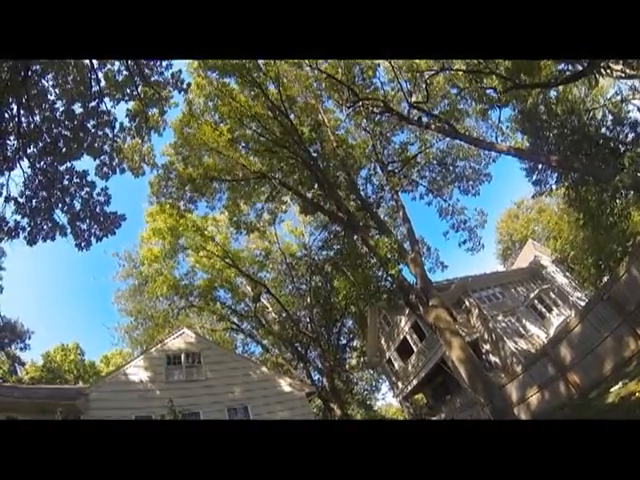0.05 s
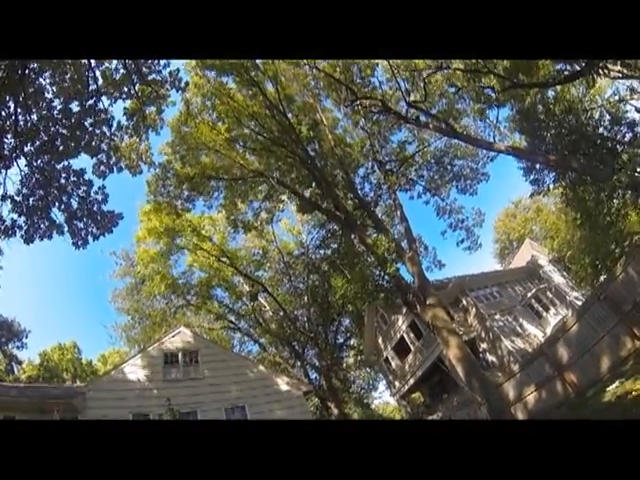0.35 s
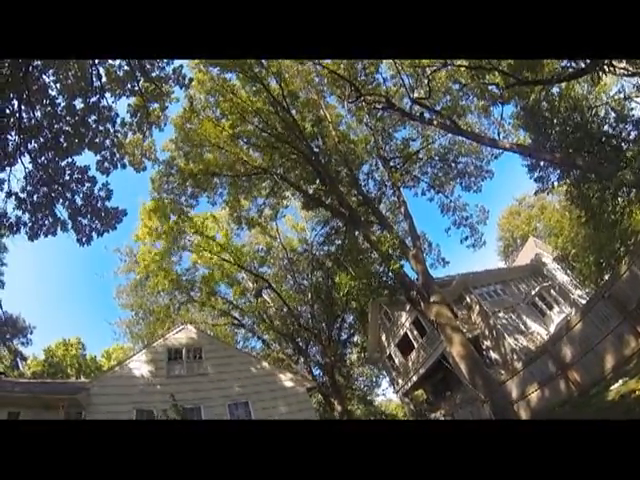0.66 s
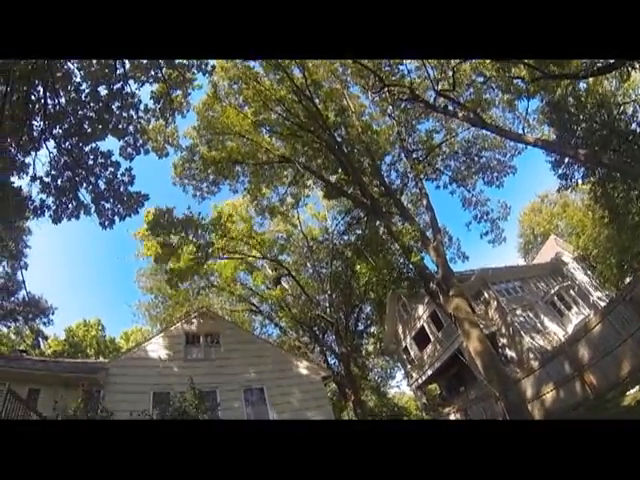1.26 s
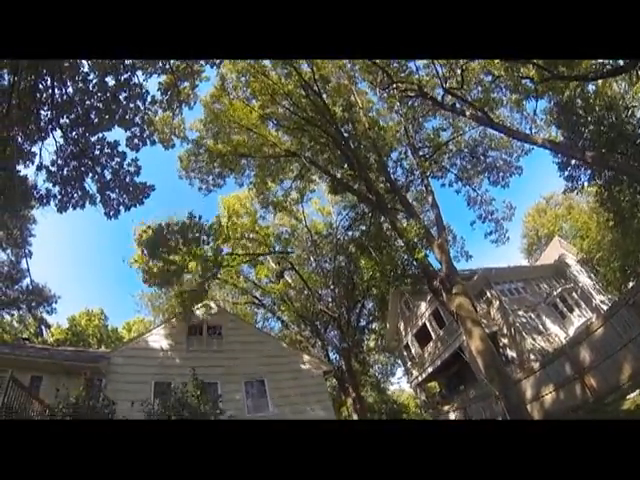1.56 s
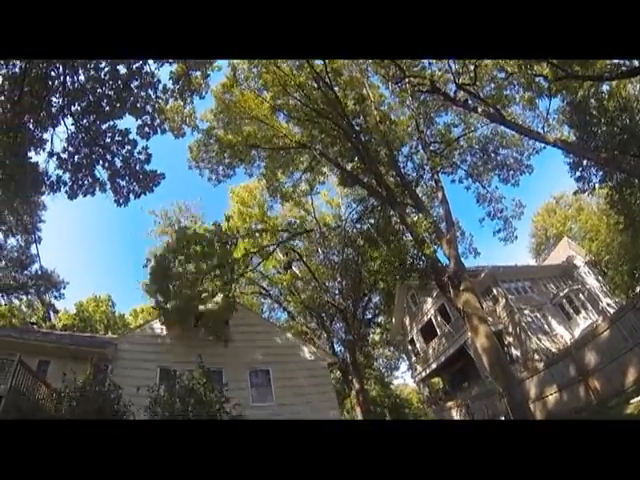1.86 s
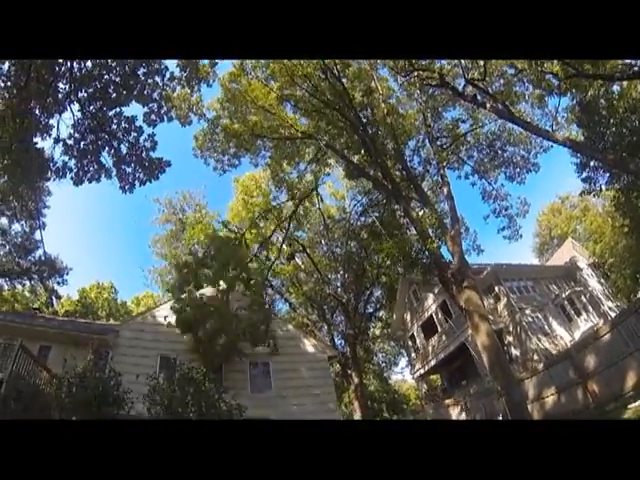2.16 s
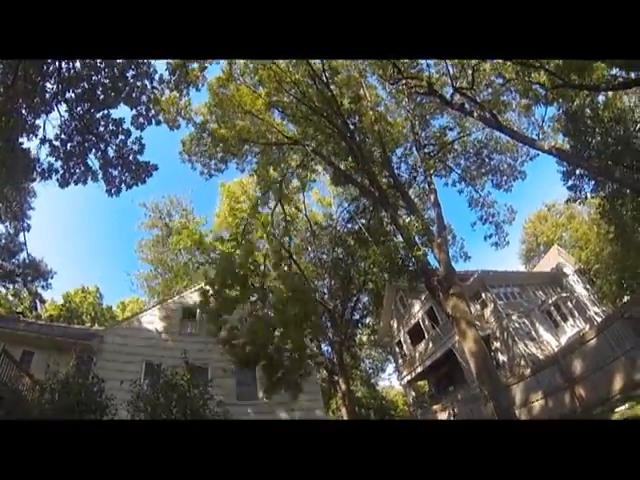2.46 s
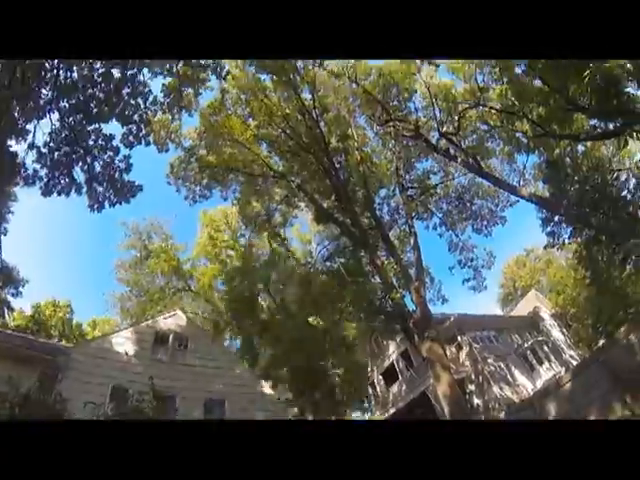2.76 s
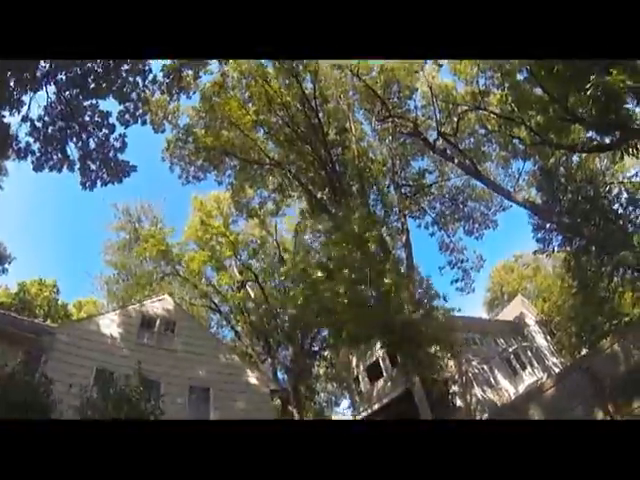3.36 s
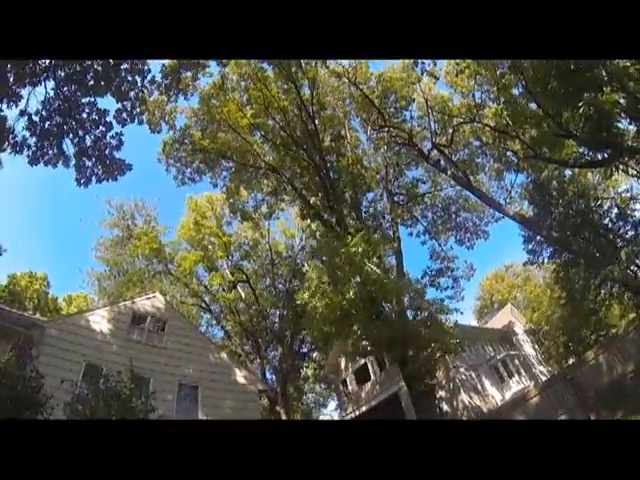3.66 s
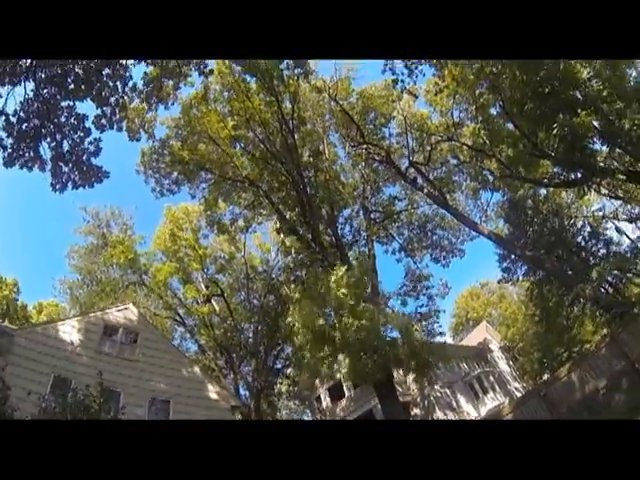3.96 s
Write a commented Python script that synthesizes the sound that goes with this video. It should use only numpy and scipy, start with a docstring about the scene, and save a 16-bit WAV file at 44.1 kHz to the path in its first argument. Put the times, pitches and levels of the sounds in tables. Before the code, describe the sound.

A brief scrape fades, and at about 0.45 seconds a cut tree limb snaps sharply, echoing round the yard. Smaller cracks follow near 0.8 to 1 second and again around 1.8 to 2.2, with leaves rustling faintly as it swings. From 2 seconds, low wind buffeting and soft thumps hit the microphone, strongest near 3 seconds. A steady outdoor hush and a very faint electronic whine run underneath.

```python
"""A scrape fades, then a cut limb snaps off high in a tree between houses. It cracks again as it tips,
then swings through the leaves on a rope. Every crack echoes round the yard.
Throughout, a small camera in a rigid case hears it: the case rings in the mids, air buffets it in the
bass, and its electronics whine faintly once per frame. Soft knocks hit the case in the second half."""
import sys
import numpy as np
from scipy import signal
from scipy.fft import rfft, irfft
from scipy.io import wavfile
from scipy.ndimage import uniform_filter1d

SR = 44100
rng = np.random.default_rng(int(sys.argv[2]) if len(sys.argv) > 2 else 0)


def store_pcm(level_fs):
    """Save levels as 16-bit WAV."""
    pcm = np.round(np.clip(level_fs, -1, 1) * 32767).astype(np.int16)
    wavfile.write(sys.argv[1], SR, np.atleast_2d(pcm).T)


N = 176400

# camera case resonances (centre [Hz], width [Hz], boost [dB])
CASE_MODES = [(397, 120, 5), (1292, 187, 9.5), (1514, 125, 9.5), (1631, 116, 8.5), (1963, 31, 2),
              (2208, 194, 8.5), (2378, 93, 9), (2460, 30, 2), (2770, 43, 1), (3106, 250, 8.5),
              (3500, 320, 4.5), (4230, 61, 0.5), (5033, 84, 8.5), (5150, 120, 3.5), (6700, 410, 1),
              (7880, 230, 4.5)]
# outdoor air spectrum (frequency [Hz], gain [dB])
AIR_COLOUR = [(30, 9.5), (100, 12), (200, 3.5), (350, -0.5), (550, -3), (1000, -8), (1600, -11),
              (2300, -14.5), (3300, -21), (5000, -17), (8000, -23.5), (12000, -23.5), (15000, -32.5)]
# electronic whine partials (frequency [Hz], level [dB])
WHINE_PARTIALS = [(5700, -67.5), (11400, -69.5)]
# air buffeting the case (time [s], level [dB])
BUFFET_LEVEL = [(0, -56), (.15, -58), (.22, -41.5), (.28, -55.5), (.9, -53.5), (1.12, -48.5), (1.3, -53.5),
                (1.45, -50), (1.7, -50.5), (2.08, -43), (2.28, -39.5), (2.7, -44), (2.9, -39.5), (3.0, -37),
                (3.1, -45), (3.24, -38.5), (3.45, -48), (3.58, -40), (3.75, -41.5), (4, -45)]
# buffeting spectrum (frequency [Hz], gain [dB])
BUFFET_COLOUR = [(8, -10.5), (18, 0), (28, -4.5), (40, -0.5), (55, -5.5), (80, -22.5), (110, -27.5),
                 (160, -31), (300, -43), (800, -83)]
# soft knocks on the case, each one push-pull pulse (time [s], peak [dB], pitch [Hz]: higher is shorter)
CASE_THUMPS = [(2.263, -35.5, 30), (2.331, -34, 30.2), (2.853, -32, 101), (2.963, -29.5, 91),
               (2.973, -18, 26.6), (3.026, -25, 33.4), (3.103, -36.5, 109), (3.167, -34.5, 96),
               (3.225, -39, 71), (3.257, -34.5, 53), (3.571, -30.5, 25.5), (3.606, -30, 43),
               (3.658, -36.5, 109)]
# leaves and twigs brushing (time [s], gain [dB])
LEAF_LEVEL = [(.42, -71), (.6, -59.5), (.85, -65), (1.05, -62.5), (1.25, -65.5), (1.73, -65.5),
              (1.83, -57.5), (2.03, -59), (2.2, -62.5), (2.7, -67), (3.0, -62.5), (3.38, -60.5),
              (3.6, -64.5), (4, -65.5)]
# leaf spectrum (frequency [Hz], gain [dB])
LEAF_COLOUR = [(200, -3.5), (700, 4), (1100, -0.5), (1600, 4.5), (2300, 3), (3300, -0.5), (5000, -4.5),
               (8000, -9.5), (11000, -16.5), (15000, -19)]
# leaves brightening as they swing nearer (time [s], treble gain [dB])
LEAF_BRIGHTNESS = [(.6, -2), (1.9, 1), (3.1, 2.5), (4, 4)]
# opening scrape (time [s], level [dB])
SCRAPE_LEVEL = [(0, -51), (.12, -55), (.19, -57), (.27, -62), (.42, -67.5), (.6, -88)]
# scrape spectrum (frequency [Hz], gain [dB])
SCRAPE_COLOUR = [(200, -10), (700, -0.5), (1100, -2.5), (1600, 1), (2200, 3), (3300, -3.5), (5000, -8),
                 (8000, -14.5), (11000, -22), (15000, -25)]
# house wall reflections (delay [s], gain [dB])
WALL_ECHOES = [(0.0309, -27), (0.042, -17)]
# yard echo spectrum (frequency [Hz], gain [dB])
YARD_COLOUR = [(100, 16), (380, 2), (900, 2), (1600, -1.5), (2400, -7.5), (3300, -6.5), (5000, 3),
               (8000, 3.5), (14000, -2)]
# breaking wood spectrum (frequency [Hz], gain [dB])
WOOD_COLOUR = [(100, -12.5), (380, -0.5), (600, -3.5), (1000, -0.5), (1500, 4.5), (2300, 6), (3300, -1),
               (5000, -4), (7000, -10.5), (9500, -20), (12000, -14.5), (15000, -31)]
# wood fibres breaking
# (time [s], level over CRACK_S [dB], knock [Hz], knock boost [dB], splinter decay [s], echo send [dB])
FIBRE_BREAKS = [(0.4379, -50, 4200, 17, 0.0042, -2), (0.4478, -48, 1030, 9, 0.00079, 6.5),
                (0.4501, -31.5, 3030, 9.5, 0.0016, 3), (0.4516, -33.5, 2420, 13, 0.0026, 0),
                (0.4559, -33.5, 2220, 9, 0.0025, 2.5), (0.46, -42, 1650, 12, 0.0017, 5),
                (0.7043, -55.5, 1660, 12, 0.0056, -4), (0.8211, -39.5, 1360, 7.5, 0.0017, -5),
                (0.826, -50.5, 2400, 1, 0.0045, 5.5), (.861, -54, 1610, 13, .003, -2),
                (0.953, -53, 1690, 14, .006, -3), (0.989, -49.5, 1600, 17, .004, 3.5),
                (1.0440, -55, 1910, 5, 0.01, -1), (1.8331, -43, 1520, 18, 0.0027, 3),
                (1.836, -53.5, 396, 22, 0.0054, -5), (1.846, -47, 1530, 16, 0.0079, 4),
                (1.861, -49, 1570, 18, 0.0079, -5), (1.876, -48.5, 1590, 19, 0.0055, 2),
                (1.9442, -52, 1560, 15, 0.0035, -4), (2.005, -48, 1570, 6, 0.03, 0),
                (2.159, -54, 1680, 7, .016, -3), (2.430, -56, 2200, 9, 0.0083, 5),
                (2.550, -55.5, 2150, 20, .008, 3), (2.952, -57.5, 2230, 14, 0.0017, 0),
                (3.436, -57, 1510, 10, 0.005, -6)]

AIR_DB = -59
FRAME_HZ, FRAME_START_S, WHINE_DUTY, WHINE_WANDER_HZ = 59.94, 0.012, 0.41, 32
LEAF_TICKS_PER_S, LEAF_SCATTER_DB, LEAF_SPLIT_HZ = 7000, 1, 3740
ECHO_BUILD_S, LATE_CUTOFF_HZ = 0.0075, 5500
CRACK_S, CLICK_MAX_DB, FAST_BREAK_S, KNOCK_WIDTH_RATIO = 0.005, -11.5, 0.00064, 0.47
TOP_HZ = 15050


def undb(db):
    """Decibels to gain."""
    return 10 ** (np.asarray(db) / 20)


def unit(x):
    """Scale to rms 1."""
    return x / np.sqrt(np.mean(x ** 2))


def curve(rows):
    """Gain over time from (time [s], level [dB]) rows."""
    return undb(np.interp(np.arange(N) / SR, *np.array(rows).T))


def colour(x, points, resonances=()):
    """Minimum-phase filter from (frequency [Hz], gain [dB]) points plus resonant peaks."""
    size = 8192
    bins_hz = np.maximum(np.arange(size // 2 + 1) * SR / size, 1)
    hz, db = np.array(points).T
    shape_db = np.interp(np.log(bins_hz), np.log(hz), db)
    for centre_hz, width_hz, boost_db in resonances:
        shape_db += boost_db / (1 + (2 * (bins_hz - centre_hz) / width_hz) ** 2)
    cepstrum = irfft(np.log(undb(shape_db)))
    cepstrum[1:size // 2] *= 2
    cepstrum[size // 2 + 1:] = 0
    response = irfft(np.exp(rfft(cepstrum)))[:size // 2]
    return signal.fftconvolve(x, response)[:len(x)]


def lowpass(x, hz, order=2):
    """Butterworth roll-off above hz."""
    return signal.sosfilt(signal.butter(order, hz, fs=SR, output="sos"), x)


def spray(t, decay_s):
    """Fading spray of tiny impulses: even spectrum, unit energy."""
    fade = np.exp(-t / decay_s)
    spectrum = rfft(rng.standard_normal(len(t)) * fade)
    burst = irfft(spectrum / np.abs(spectrum), len(t)) * np.sqrt(fade)
    return burst / np.linalg.norm(burst)


def air():
    """Steady outdoor hush, heard through the case."""
    return undb(AIR_DB) * unit(colour(rng.standard_normal(N), AIR_COLOUR, CASE_MODES))


def whine():
    """Camera electronics: a thin tone and its octave, gated once per frame."""
    t = np.arange(N) / SR
    frame_phase = ((t - FRAME_START_S) * FRAME_HZ) % 1
    gate = uniform_filter1d(1. * (frame_phase < WHINE_DUTY), size=30)
    wander_hz = WHINE_WANDER_HZ * unit(lowpass(rng.standard_normal(N), hz=130))
    drift_cycles = np.cumsum(wander_hz) / SR
    return gate * sum(undb(db) * np.sin(2 * np.pi * (hz * t + harmonic * drift_cycles))
                      for harmonic, (hz, db) in enumerate(WHINE_PARTIALS, 1))


def buffeting():
    """Low turbulence on the case, plus push-pull thumps as it is moved."""
    t = np.arange(N) / SR
    out = unit(colour(rng.standard_normal(N), BUFFET_COLOUR)) * curve(BUFFET_LEVEL)
    for at_s, peak_db, hz in CASE_THUMPS:
        phase = np.pi * hz * (t - at_s)
        push = phase / (1 + phase ** 2) ** 2.15
        out += undb(peak_db) * push / push.max()
    return out


def leaves():
    """Dense foliage ticks, swelling as the limb moves, brighter as it nears."""
    hits = rng.random(N) < LEAF_TICKS_PER_S / SR
    ticks = hits * rng.standard_normal(N) * undb(LEAF_SCATTER_DB * rng.standard_normal(N))
    rustle = unit(colour(ticks, LEAF_COLOUR, CASE_MODES))
    body = lowpass(lowpass(rustle, LEAF_SPLIT_HZ)[::-1], LEAF_SPLIT_HZ)[::-1]  # zero phase
    treble = rustle - body
    return (body + treble * curve(LEAF_BRIGHTNESS)) * curve(LEAF_LEVEL)


def scrape():
    """Smooth swish, fading as the limb gives way."""
    return unit(colour(rng.standard_normal(N), SCRAPE_COLOUR, CASE_MODES)) * curve(SCRAPE_LEVEL)


def echo_tail(db, t60_s):
    """Scattered reflections: quick build-up, exponential decay."""
    t = np.arange(SR) / SR
    echoes = spray(t, t60_s / np.log(1000) * 1.5)  # 1.5 offsets the spray's extra fade
    echoes *= 1 - np.exp(-t / ECHO_BUILD_S)
    return undb(db) * echoes / np.linalg.norm(echoes)


def yard(x):
    """Two wall echoes, quick scatter from the houses, a long duller tail from the trees."""
    houses = echo_tail(db=-3.5, t60_s=0.38)
    trees = lowpass(echo_tail(db=-6.5, t60_s=0.92), LATE_CUTOFF_HZ, order=1)
    response = houses + trees
    for delay_s, db in WALL_ECHOES:
        response[int(delay_s * SR)] += undb(db)
    return colour(signal.fftconvolve(x, response)[:N], YARD_COLOUR)


def cracks():
    """Fibres break: click, splinters and a broad woody knock. Returns (direct, echo send)."""
    out = np.zeros((2, N))
    t = np.arange(SR // 5) / SR
    for start_s, db, knock_hz, knock_db, splinter_s, echo_db in FIBRE_BREAKS:
        burst = spray(t, splinter_s)
        burst[0] += undb(CLICK_MAX_DB) * min(FAST_BREAK_S / splinter_s, 1)  # slower break, weaker click
        knock = (knock_hz, KNOCK_WIDTH_RATIO * knock_hz, knock_db)
        crack = colour(burst, WOOD_COLOUR, [*CASE_MODES, knock])
        crack *= undb(db) * np.sqrt(CRACK_S * SR) / np.linalg.norm(crack)
        i = int(start_s * SR)
        out[:, i:i + len(t)] += [crack, undb(echo_db) * crack]
    return out


def scene():
    """Limb and echo over outdoor air and camera noise; mono."""
    direct, echo_send = cracks()
    return (direct + yard(echo_send) + scrape() + leaves() + air() + buffeting() + whine())[None]


def record(dry):
    """The camera cuts steeply above TOP_HZ."""
    return signal.sosfilt(signal.ellip(10, .2, 70, TOP_HZ, fs=SR, output="sos"), dry)


dry = scene()
out = record(dry)
store_pcm(out)
```